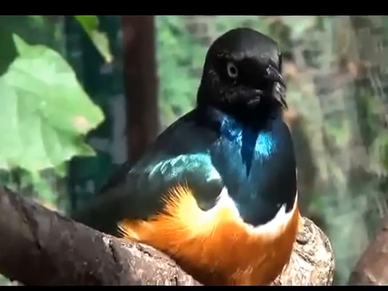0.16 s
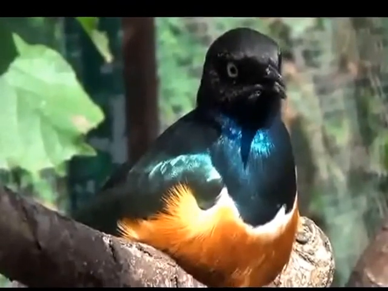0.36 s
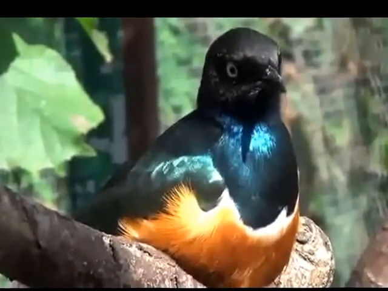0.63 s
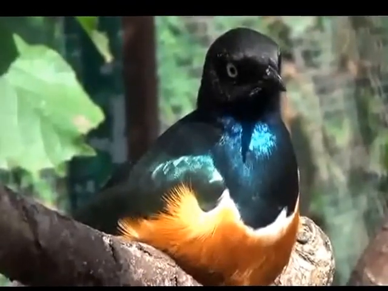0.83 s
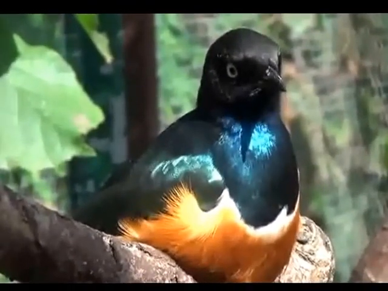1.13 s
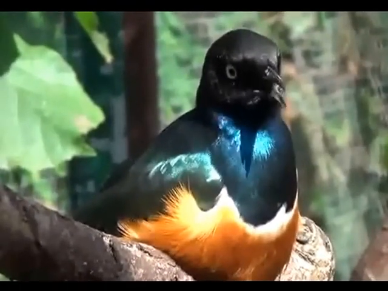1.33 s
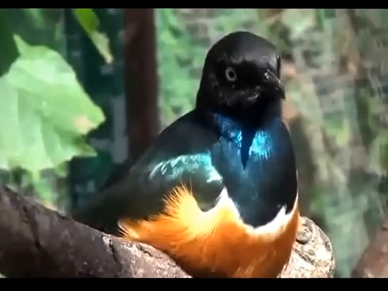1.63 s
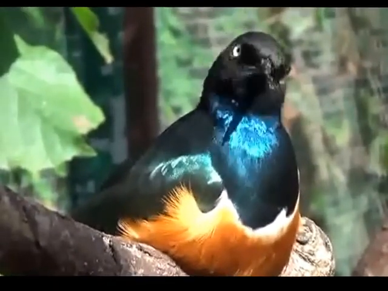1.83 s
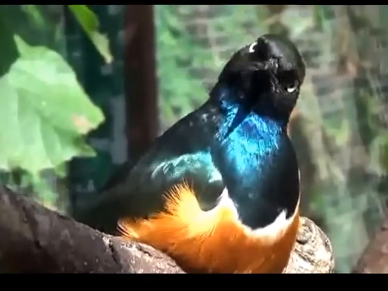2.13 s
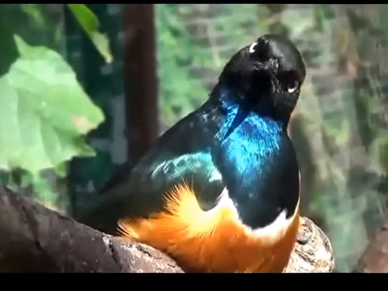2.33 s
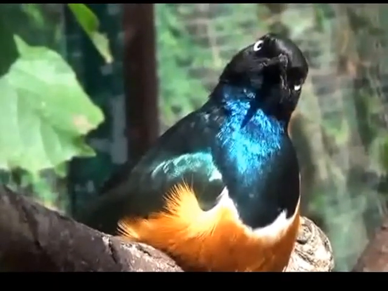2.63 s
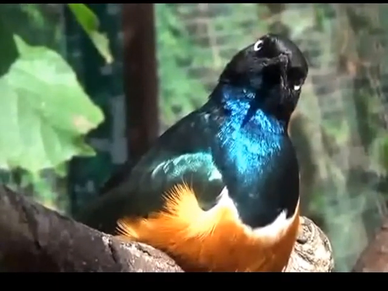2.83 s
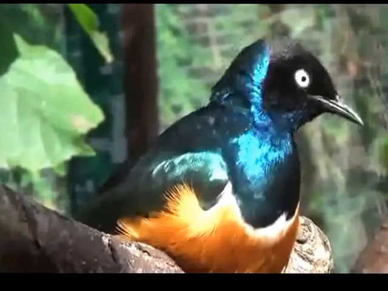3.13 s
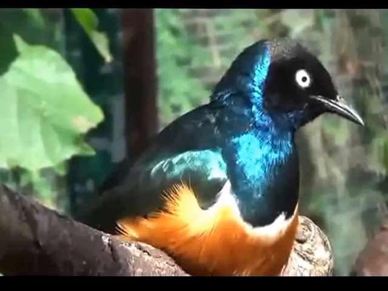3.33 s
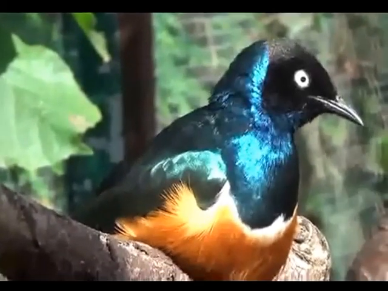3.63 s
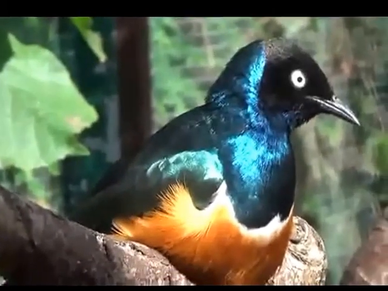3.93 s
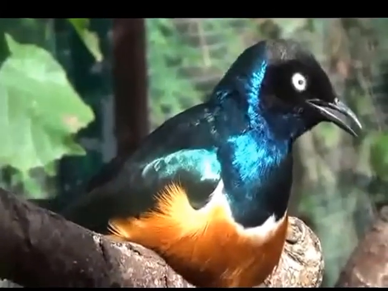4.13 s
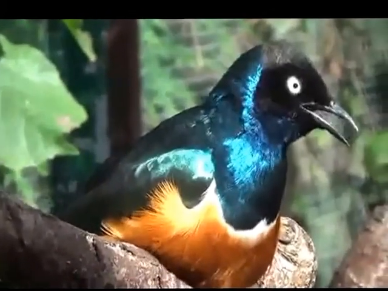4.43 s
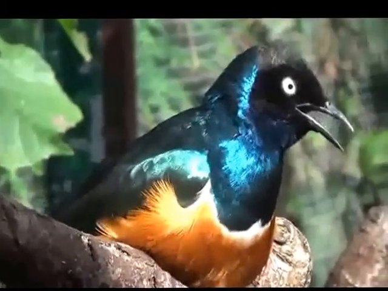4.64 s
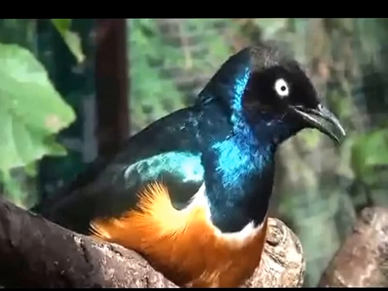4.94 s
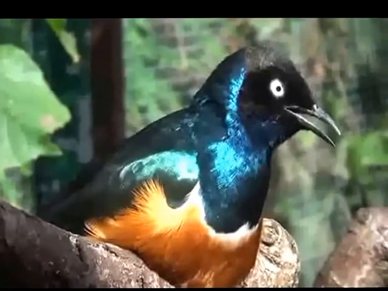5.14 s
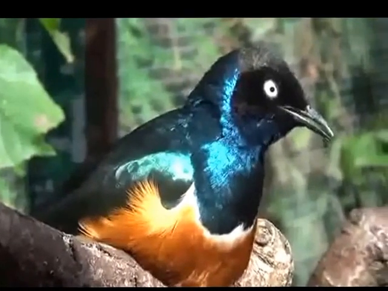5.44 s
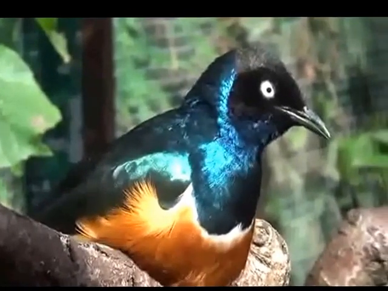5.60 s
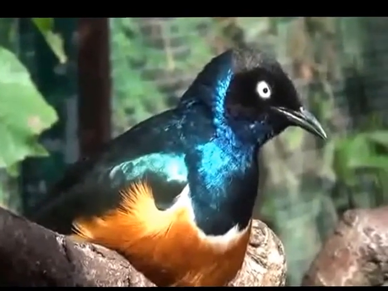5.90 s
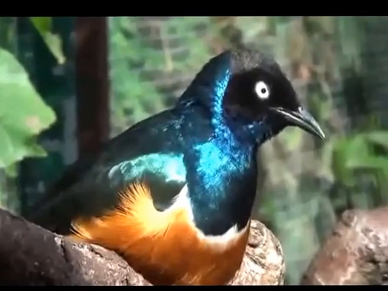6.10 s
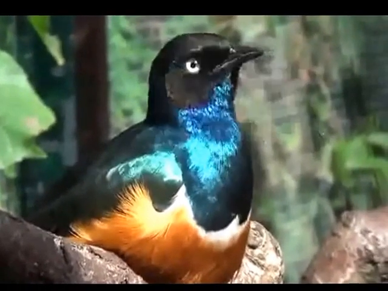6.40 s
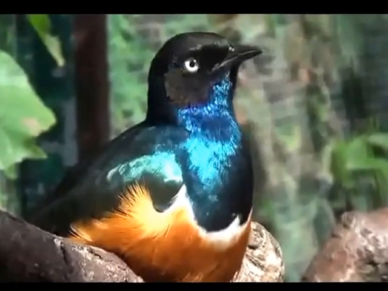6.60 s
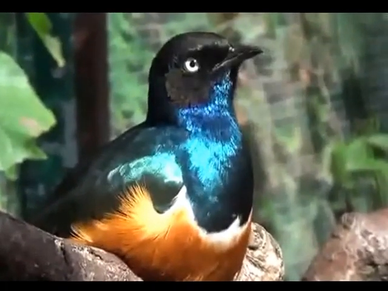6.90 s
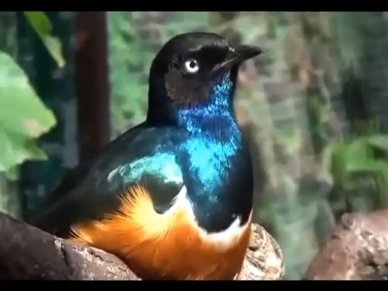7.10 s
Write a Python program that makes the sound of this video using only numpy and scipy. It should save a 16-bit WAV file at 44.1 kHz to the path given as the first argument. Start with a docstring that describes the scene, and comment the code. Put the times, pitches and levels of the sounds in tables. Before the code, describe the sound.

A starling close by squawks, chirps sharply and rasps up into piercing whistles, while other birds call and twitter in an echoing aviary.

```python
"""A starling sings close to the microphone: squawks, arched chirps, and rasps that tighten into whistles.
One syrinx model makes every call, sliding from pure tone through flutter into chaos, coloured by throat
and beak. Other birds call further off in an echoing enclosure, over a blurred twitter of band-shaped
noise and tiny notes, and a low noise wash. A dull-topped recorder clips on the loudest notes."""
import sys
import numpy as np
from scipy import signal
from scipy.fft import rfft, irfft
from scipy.io import wavfile
from scipy.ndimage import uniform_filter1d, map_coordinates

SR = 44100
rng = np.random.default_rng(int(sys.argv[2]) if len(sys.argv) > 2 else 0)


def transcribe(u):
    """Save the signal u as a 16-bit wav file named by the first command-line argument.

    u: samples, shape (n,) or (channels, n), limited to [-1, 1]; the rate is SR.
    q: integer samples, one column per channel.
    """
    v = np.clip(np.atleast_2d(u).T, -1, 1)
    q = np.round(v * 32767).astype(np.int16)
    wavfile.write(sys.argv[1], SR, q)


N = 320166
TIME = np.arange(N) / SR  # seconds

# Swell of the blurred twitter of many distant birds. Each row: time in seconds, level in dB before the mix.
TWITTER_SWELL = [(0, -26), (.55, -28), (.75, -38.5), (1.2, -39.5), (1.6, -28.5), (2.15, -30.5), (3.05, -24),
                 (3.5, -17), (3.9, -27.5), (4.95, -28.5), (5.7, -20), (6.1, -22.5), (7.26, -26.5)]
# Colour of that twitter. Each row: frequency in Hz, gain in dB.
TWITTER_TONE = [(700, -26), (1500, -11.5), (2300, -1), (3100, 4), (4000, 3), (4800, -5.5), (5500, -4),
                (6500, -15)]


def undb(db):
    """Decibels to gain."""
    return 10 ** (np.asarray(db) / 20)


def curve(rows, t):
    """Each later column of a table, joined by straight lines along its first column."""
    s, *columns = np.transpose(rows)
    return [np.interp(t, s, c) for c in columns]


def response(points, hz):
    """Gain of a (Hz, dB) spectrum at the given frequencies, joined along a log frequency axis."""
    f, db = np.transpose(points)
    return undb(np.interp(np.log(hz + 1), np.log(f), db))


def wander(rate, size=N):
    """Smooth chance of spread near 1 that changes about rate times a second."""
    held = rng.standard_normal(size // 4 + 4)
    place = np.arange(size) * min(rate, SR / 5) / SR
    return map_coordinates(held[:int(place[-1]) + 4], [place], order=2, mode="nearest")


def span(start, length):
    """The samples of a note, and its progress from 0 to 1."""
    first = max(int(start * SR), 0)
    last = min(int((start + length) * SR), N)
    t = np.arange(first, last)
    return t, np.linspace(0, 1, len(t))


def starling(room_db=-17):
    """The near bird, thrown left or right as its head turns, with echoes off nearby surfaces."""
    # Where the beak throws the song. Each row: time in seconds, left minus right in dB.
    beak_aim = [(.4, -1.3), (1, -10), (1.25, -11), (1.42, -3), (1.9, -1.5), (2.55, -7.5), (3.35, -10.5),
                (3.82, -9.5), (4.25, -3), (5.4, -1), (6.7, 10)]
    # Nearby surfaces. Each row: delay in seconds, left level in dB, right level in dB.
    surfaces = [(.0023, -38.5, -21.5), (.0061, -5.5, -20), (0.0279, -18, -16.5), (.069, -28.5, -31.5)]
    voice = song()
    aim_db, = curve(beak_aim, TIME)
    sides = []
    for side_db in (aim_db / 2, -aim_db / 2):
        # the louder side also hears it a fraction of a sample sooner
        shifted = map_coordinates(voice, [np.arange(N) + .1 * side_db])
        sides.append(undb(side_db) * shifted)
    out = np.array(sides)
    for delay, left_db, right_db in surfaces:
        echo = np.pad(voice, (int(abs(delay) * SR), 0))[:N]
        out += undb([[left_db], [right_db]]) * echo
    return out + undb(room_db) * enclosure(voice, t60=.28, width=.8)


def song():
    """All of the starling's syllables, each kind with its own fall of overtones per octave."""
    # The opening squawk, a rattle of sagging notes. Each row: start in seconds, length in seconds,
    # start pitch in Hz, end pitch in Hz, level in dB at the start, roughness (0 pure, 1 chaotic).
    squawks = [ (0.254, 0.029, 1952, 1990, -8, 0.68), (0.283, 0.045, 1655, 1450, -4, 0.68),
               (0.33, 0.027, 1662, 1670, -6, 0.86), (0.367, 0.021, 1540, 1018, -6, 0.56),
               (0.384, 0.0106, 1410, 1152, -7.5, 0.32), (0.391, .038, 1297, 1124, -7, 0.54),
               (0.43, 0.019, 1040, 958, -15.5, .9), (.473, 0.01, 1385, 1084, -5.5, 0.16),
               (.492, 0.012, 1306, 1127, -6, 0.34), (0.505, 0.0154, 1214, 1118, -8.5, 0.8), ]
    # Chirps that bend once. Each row: start in seconds, length in seconds, start, turn and end pitch in Hz,
    # turn as a share of the length, level in dB at the best pitch, roughness at the best pitch.
    chirps = [ (0.27, 0.019, 4250, 4040, 3725, 0.61, -4, 0.15),
              (0.987, 0.031, 2230, 4180, 1880, 0.48, -19, 0.85),
              (0.994, .044, 5060, 4850, 1910, 0.27, -14.5, 0.97),
              (1.194, 0.041, 3330, 3456, 3005, 0.4, -20.5, 0.57),
              (1.221, 0.032, 2980, 3270, 2300, 0.4, -16, 0.5),
              (1.409, 0.041, 3040, 3620, 3350, 0.79, -3.5, 0.2),
              (1.443, .017, 3200, 2876, 2830, 0.38, 2, 0.23),
              (1.515, 0.043, 2920, 3665, 3030, 0.47, -1.9, 0.03),
              (1.604, 0.05, 2370, 3690, 2720, 0.49, -3.5, 0.24),
              (1.713, 0.049, 2400, 3725, 2360, 0.28, -5, 0.46),
              (1.876, 0.024, 2220, 3722, 2770, 0.78, -3, 0.19),
              (1.89, 0.02, 2920, 2374, 1910, 0.35, -2, 0.29), (4.473, 0.012, 3900, 4200, 3900, 0.4, -8, .3),
              (5.238, .01, 3910, 4200, 3830, 0.46, -8.5, 0.1),
              (5.324, 0.021, 3410, 2108, 2170, .7, -10, 0.2),
              (5.389, 0.057, 5010, 4104, 4150, 0.76, -9, 0.3),
              (5.437, 0.024, 4170, 2160, 3260, 0.52, -6.5, 0.54), ]
    # Rasps that tighten upwards. Each row: start in seconds, length in seconds, start and end pitch in Hz,
    # mid level in dB, crescendo in dB, mid level of the upper voice in dB, roughness of the lower voice.
    rasps = [ (2.53, .33, 1792, 1873, -18, -4.5, -19, 0.96), (3.333, 0.13, 1437, 2150, -18, 3.5, -18, 0.91),
             (3.517, 0.23, 2116, 3530, -22, 15.5, -21, 0.98),
             (4.279, 0.057, 1330, 1791, -8.5, -5, -24, 0.99),
             (4.31, 0.12, 1878, 2290, -11.5, 3.5, -34, 0.92),
             (4.542, 0.18, 2130, 3090, -12.5, 6.5, -17, 0.83),
             (5.037, .088, 1332, 1712, -12.5, 4, -35, .95), (5.098, 0.097, 1900, 2916, -9.5, 4, -28, 0.78),
             (6.749, 0.11, 1520, 1844, -22.5, 5.5, -44, 1.07), ]
    # The whistles that the rasps open into, one curve each.
    # Each row of a curve: time in seconds, pitch in Hz, level in dB before a common trim.
    whistles = [
        [(3.435, 2975, -9), (3.441, 2997, -10.5), (3.453, 3430, -12.5), (3.471, 3654, -7), (3.523, 3685, -9.5),
         (3.535, 3700, -9)],
        [(3.73, 3446, -21), (3.742, 3740, -27), (3.748, 3545, -14.5), (3.776, 3567, -14), (3.796, 3298, -21),
         (3.808, 3234, -15.5), (3.85, 3060, -19.5), (3.866, 3100, -16), (3.875, 3350, -31)],
        [(4.43, 2850, -5), (4.436, 2856, -12.5), (4.448, 3360, -9.5), (4.46, 3664, -6), (4.48, 3650, -8.5),
         (4.49, 3570, -11), (4.503, 3430, -19)],
        [(4.507, 3170, -17), (4.515, 3185, -12), (4.543, 3397, -4), (4.555, 3370, -13)],
        [(4.7, 2890, -8), (4.71, 3314, -7.5), (4.742, 3411, -6.5), (4.768, 4010, -17.5), (4.79, 3685, -8.5),
         (4.814, 3277, -13.5), (4.834, 3210, -9), (4.87, 2980, -16), (4.875, 3000, -1)],
        [(5.195, 3223, -14), (5.205, 3601, -8), (5.219, 3820, -4.5), (5.235, 3790, -8.5), (5.265, 3518, -10),
         (5.283, 3162, -16), (5.293, 3220, -8.5), (5.307, 3320, -12.5), (5.326, 3380, -5)],
    ]
    # Low buzzes that swell until they crack. Each row: start in seconds, length in seconds,
    # nominal pitch in Hz, level reached in dB.
    buzzes = [(2.495, .07, 1269, -21.5), (3.223, .065, 1242, -21), (4.218, .072, 1372, -6),
              (4.996, 0.054, 1290, -12.5)]
    # Soft creaks through the closed beak. Each row: start in seconds, length in seconds,
    # start pitch in Hz, end pitch in Hz, mid level in dB, roughness.
    creaks = [(0, 0.032, 630, 581, -26, 0.1), (0, 0.047, 1210, 1100, -29, 0.4),
              (0.089, .085, 1013, 883, -24.5, 0.91), (0.162, 0.067, 1063, 1078, -17, 0.57),
              (0.212, 0.0316, 1085, 1265, -13.5, 0.83), (.234, 0.0144, 1985, 1754, -15.5, 0.7)]
    # Low tones held by the idle side of the syrinx; columns as for the creaks.
    undertones = [(4.344, .08, 1860, 2026, -16.5, 0), (4.772, 0.025, 1910, 1877, -28, 0)]

    out = sing([squawk(*row) for row in squawks], tilt_db=0.0)
    out += sing([chirp(*row) for row in chirps], tilt_db=-0.8)
    out += sing([voice for row in rasps for voice in rasp(*row)], tilt_db=-1.45)
    out += sing([whistle(rows) for rows in whistles], tilt_db=-7.5)
    out += sing([buzz(*row) for row in buzzes], tilt_db=-3.0)
    out += sing([slur(*row) for row in creaks + undertones], tilt_db=-8.5)
    return out


def squawk(start, length, start_hz, end_hz, db, rough):
    """Starts at full force; the pitch drops fast, then settles."""
    fade_db, sag = 3, 1.75  # fall in level over a note; how early its pitch drops
    t, u = span(start, length)
    pitch = end_hz + (start_hz - end_hz) * (1 - u) ** sag
    return t, pitch, db - fade_db * u, rough


def chirp(start, length, start_hz, turn_hz, end_hz, turn, db, rough):
    """The pitch arches through its turn; off the best pitch the note weakens and frays."""
    best_hz, detune_db_per_octave = 3584, 10
    strain_per_octave = 0.24  # share of the missing roughness gained off the best pitch
    arch_power = 2.7  # 2 is a parabola; more gives a flatter top and steeper sides
    attack_s, attack_db, fade_db = 0.0073, 4.5, 7  # swell at the start, fall in level at the end
    t, u = span(start, length)
    turn = np.clip(turn, .05, .95)
    far_hz = np.where(u < turn, start_hz, end_hz)
    distance = np.interp(u, [0, turn, 1], [1, 0, 1])  # from the turn
    pitch = turn_hz + (far_hz - turn_hz) * distance ** arch_power
    detune = abs(np.log2(pitch / best_hz))  # octaves
    attack = attack_db * np.exp(-(u * length / attack_s) ** 2)
    level = db - detune_db_per_octave * detune - attack - fade_db * u ** 4
    return t, pitch, level, rough + strain_per_octave * detune * (1 - rough)


def rasp(start, length, start_hz, end_hz, db, crescendo_db, upper_db, rough):
    """Two warbling, throbbing voices: the lower climbs late, the upper swells and fades around one pitch."""
    climb, edge_db = 2.6, 11  # how late the pitch climbs; how far the level sinks at either end
    warble_hz, lower_depth, upper_depth = 42.25, 0.038, .08  # each side wobbles by this share of its pitch
    pulse_db = 1  # the level throbs with the warble
    upper_hz, upper_rough = 4273, .72  # the other side of the syrinx
    t, u = span(start, length)
    warble_rate = warble_hz * (1 + .2 * wander(40, len(t)))
    warble = np.sin(2 * np.pi * np.cumsum(warble_rate) / SR)
    edge = (2 * u - 1) ** 2
    lower_pitch = (start_hz + (end_hz - start_hz) * u ** climb) * (1 + lower_depth * warble)
    lower_level = db + crescendo_db * (u - .5) - edge_db * edge ** 3 + pulse_db * warble
    upper_pitch = upper_hz * (1 + upper_depth * warble)
    upper_level = upper_db - edge_db * edge - pulse_db * warble
    return (t, lower_pitch, lower_level, rough), (t, upper_pitch, upper_level, upper_rough)


def whistle(rows):
    """A gliding tone, pure at the top and fluttering lower down."""
    # Flutter grows as the whistle sinks. Each row: pitch in Hz, roughness.
    sinking_rough = [(2950, 0.89), (3300, 0.38), (3700, 0.1)]
    trim_db = -1
    start, end = rows[0][0], rows[-1][0]
    t, _ = span(start, end - start)
    pitch, db = curve(rows, t / SR)
    return t, pitch, db + trim_db, curve(sinking_rough, pitch)[0]


def buzz(start, length, hz, db):
    """Growing pressure makes the note louder, a little higher and ever rougher."""
    swell_db, rise = 14, .06  # pitch rises by this share
    rough_ends = (.33, 0.756)  # roughness at start and end
    t, u = span(start, length)
    slack = (1 - u) ** 2
    pitch = hz * (1 + rise * (u.mean() / 2 - slack))
    return t, pitch, db - swell_db * slack * (1 - u), np.interp(u, [0, 1], rough_ends)


def slur(start, length, start_hz, end_hz, db, rough):
    """An even glide that swells and fades."""
    soft_edge_db = 2.5  # starts and ends this much below its middle
    t, u = span(start, length)
    return t, start_hz * (end_hz / start_hz) ** u, db - soft_edge_db * (2 * u - 1) ** 2, rough


def sing(notes, tilt_db):
    """Notes of (samples, pitch, level, roughness) laid out in time; overtones change by tilt_db an octave."""
    out = np.zeros(N)
    for t, pitch, db, rough in notes:
        out[t] += syrinx(t, pitch, db, rough, tilt_db)
    return out


def syrinx(t, pitch, db, rough, tilt_db, flutter_hz=105, flutter_depth=2, smear_rate=800,
           half_db=-5, whistle_db=-14):
    """One syllable: a little roughness makes the tone flutter, more splits its period and scatters its pitch."""
    # Resonance of throat and beak. Each row: frequency in Hz, gain in dB.
    throat = [(450, -16), (1150, -10), (1600, -10), (2100, 0), (3000, 5), (3700, 3.5), (4500, -4),
              (5500, -9.5), (7000, 0)]
    size, wild = len(t), rough ** 2
    # fast jitter, and slower lurches that give a rasp its coarse grain
    jitter = (.009 + .06 * wild) * wander(750, size)
    lurch = .08 * wild * wander(230, size)
    phase = 2 * np.pi * np.cumsum(pitch * (1 + jitter + lurch)) / SR

    # on high notes the throat tunes itself to the fundamental and swallows the overtones
    high = np.clip((pitch - 2050) / 500, 0, 1)
    pure = np.clip(1.2 - 1.3 * rough, 0, 1)
    slope_db = tilt_db + whistle_db * high * pure
    # partials between the harmonics appear only when the membranes lose step
    split = undb(half_db) * np.clip(2 * rough - .75, 0, 1)
    tone, power = 0, 0
    for k in np.arange(1, min(8.5, 7500 / pitch.min()), .5):
        weight = response(throat, k * pitch_of(phase, pitch, jitter, lurch)) * undb(slope_db * np.log2(k))
        if k % 1:
            weight = weight * split
        smear = (.05 + .45 * rough + .35 * wild) * wander(smear_rate, size)
        tone = tone + weight * np.sin(k * phase + rng.uniform(0, 2 * np.pi) + smear)
        power = power + weight ** 2
    tone = tone * np.sqrt(2 / (power + 1e-9))

    # the breath flutters most at middling roughness; its slow loudness is evened out
    beat = 2 * np.pi * np.cumsum(flutter_hz * (1 + .25 * wander(120, size))) / SR
    depth = np.clip(flutter_depth * rough * (1 - rough), 0, 1)
    pressure = (1 + depth * np.sin(beat)) * undb(3.2 * rough * wander(450, size))
    pressure /= np.sqrt(uniform_filter1d(pressure ** 2, SR // 50))

    edge = np.minimum(np.arange(size), np.arange(size)[::-1]) / (.0015 * SR)  # 1.5 ms fades
    fade = np.sin(np.pi / 2 * np.minimum(edge, 1)) ** 2
    return tone * pressure * undb(db) * fade


def pitch_of(phase, pitch, jitter, lurch):
    """The scattered pitch in Hz that the throat colours."""
    return pitch * (1 + jitter + lurch)


def ports(a, b, width):
    """Two unrelated signals as the shared and the differing part of left and right."""
    return np.array([a + width * b, a - width * b]) / np.sqrt(1 + width ** 2)


def enclosure(x, t60, width):
    """Diffuse reverberation from decaying noise that builds up quickly and dies away by 60 dB in t60 seconds."""
    t = TIME[:SR]
    tail = rng.standard_normal((2, SR)) * undb(-60 * t / t60) * (1 - np.exp(-t / 0.0027))
    tail /= np.sqrt(np.sum(tail ** 2, axis=1, keepdims=True))
    return signal.fftconvolve(x[None], ports(*tail, width), axes=1)[:, :N]


def far_birds(direct_db=-8, room_db=-1):
    """Distant calls from the same syrinx arrive mostly as reverberation."""
    # Birds further off. Each row: start in seconds, length in seconds, start pitch in Hz, end pitch in Hz,
    # mid level in dB before the direct and room levels, roughness.
    far_calls = [ (0, 0.082, 5540, 5320, -33.5, 0.1), (0.735, 0.07, 1047, 1011, -31, 0),
                 (0.906, 0.035, 5360, 5220, -34, .3), (1.342, 0.033, 3440, 3550, -22.5, 0.86),
                 (2.035, 0.086, 5580, 3000, -23, 1.11), (2.128, 0.16, 5470, 5244, -30.5, 0.1),
                 (2.322, .04, 4260, 3380, -22, 0.65), (2.354, 0.051, 2880, 2736, -17, 0.46),
                 (2.399, 0.02, 2326, 2145, -21.5, 0.34), (2.892, 0.021, 3400, 2993, -20, 0.53),
                 (3.089, .13, 3580, 2935, -21.5, 0.8), (3.926, 0.092, 3177, 3005, -19, 0.82),
                 (5.737, 0.067, 3330, 2048, -23, 0.63), (5.898, 0.079, 3865, 2517, -15.5, 0.76),
                 (6.188, 0.091, 3933, 2234, -16.5, .55), (6.416, 0.034, 3745, 3620, -17, 0.1),
                 (6.461, .055, 2870, 2180, -20.5, 0.3), (6.771, .13, 3370, 3980, -22.5, 1.14),
                 (7.069, 0.018, 4000, 4020, -21.5, 0.04), (7.2, .06, 3000, 3260, -22, 1.1), ]
    # Faint low hoots far away; columns as for the calls.
    hoots = [(.78, 0.13, 346, 472, -38, 0.1), (.99, 0.045, 498, 452, -39.5, 0),
             (1.55, 0.13, 528, 475, -45, 0.16), (2.39, 0.04, 457, 474, -33.5, 0),
             (2.57, .16, 870, 812, -33.5, 0.1), (7.1, 0.055, 722, 680, -29.5, 0.4),
             (7.1, 0.1, 1230, 1270, -31.5, 0.26)]
    calls = sing([slur(*row) for row in far_calls], tilt_db=-3.5)
    calls += sing([slur(*row) for row in hoots], tilt_db=-19)
    return undb(direct_db) * calls + undb(room_db) * enclosure(calls, t60=0.29, width=0.36)


def flock(count=520):
    """Many brief, mostly falling notes from far away, heard only through their echoes."""
    out = np.zeros(N + SR)
    for when, height, length, glide, strength in rng.random((count, 5)):
        u = np.linspace(0, 1, int((.01 + .035 * length) * SR))
        hz = 2100 * 2.5 ** height * (1 + (.1 - .35 * glide) * (u - .5))
        tone = np.sin(2 * np.pi * np.cumsum(hz) / SR)
        note = tone * np.sin(np.pi * u) * response(TWITTER_TONE, hz)
        out[int(when * N) + np.arange(len(u))] += note * (.5 + strength)
    wet = enclosure(out[:N], t60=.3, width=.62)
    return wet / np.std(wet) * undb(curve(TWITTER_SWELL, TIME)[0])


def haze(levels, colour, width, flicker_db, flicker_rate):
    """Half-octave bands of distant noise, each flickering alone under a common swell."""
    f = np.fft.rfftfreq(N, 1 / SR)
    spectrum = rfft(ports(*rng.standard_normal((2, N)), width)) * response(colour, f)
    place = 2 * np.log2(np.clip(f, 200, 6400) / 200)  # half octaves above 200 Hz
    knots = np.arange(0, TIME[-1], 1 / flicker_rate)
    out = 0
    for band in range(11):
        part = irfft(spectrum * np.maximum(1 - abs(place - band), 0), N)
        flicker = undb(flicker_db * rng.standard_normal(len(knots)))
        out = out + part * np.interp(TIME, knots, flicker)
    return out / np.std(out) * undb(curve(levels, TIME)[0])


def scene(left_db=0.9):
    """The starling in front of distant birds, a little to the left, and the wash of the surroundings."""
    # Low wash of the surroundings. Each row: time in seconds, level in dB before the mix.
    wash_swell = [(0, -32), (.4, -39), (1.35, -36), (1.65, -43.5), (2.3, -35.5), (3.3, -36), (3.75, -43),
                  (4.25, -36), (4.85, -47.5), (5.05, -39.5), (5.35, -45), (5.65, -39), (7.15, -35.5)]
    # Colour of the wash. Each row: frequency in Hz, gain in dB.
    wash_tone = [(25, -24.5), (60, -11), (120, -5.5), (250, -3), (450, -1.5), (800, 0), (1300, -4),
                 (2200, -4.5), (5000, -50.5)]
    near = starling()
    twitter = undb(-3) * haze(TWITTER_SWELL, TWITTER_TONE, width=.62, flicker_db=2.4, flicker_rate=28)
    twitter += undb(-3.5) * flock()
    distant = (far_birds() + twitter) * undb([[left_db], [-left_db]])
    wash = undb(2.0) * haze(wash_swell, wash_tone, width=0.15, flicker_db=4.0, flicker_rate=14)
    return near + distant + wash


def record(dry, ceiling=0.92):
    """The band ends steeply above the song; the loudest notes then clip and spit thin overtones."""
    band_hz, top_hz = 5650, 16000  # band edge before clipping; top of the overtones after it
    f = np.fft.rfftfreq(N, 1 / SR)
    dull = irfft(rfft(dry) / np.sqrt(1 + (f / band_hz) ** 64), N)
    clipped = np.clip(dull, -ceiling, ceiling)
    return signal.sosfilt(signal.ellip(8, .2, 70, top_hz, fs=SR, output="sos"), clipped)


dry = scene()
out = record(dry)
transcribe(out)
```